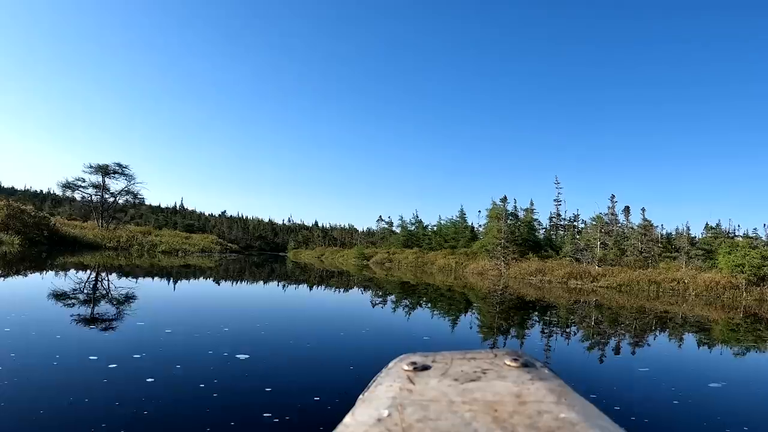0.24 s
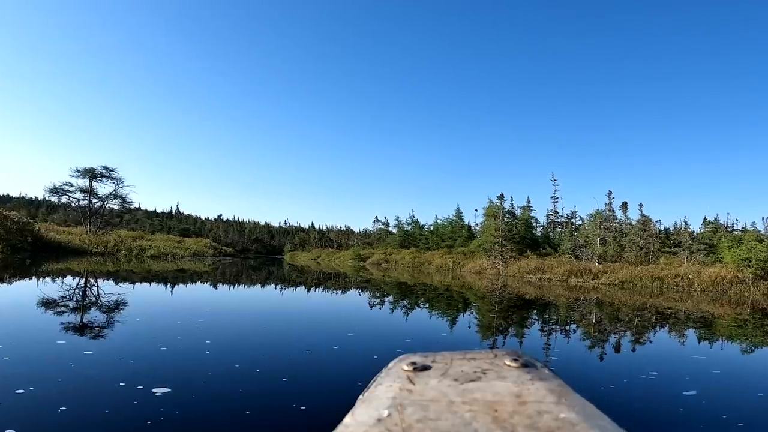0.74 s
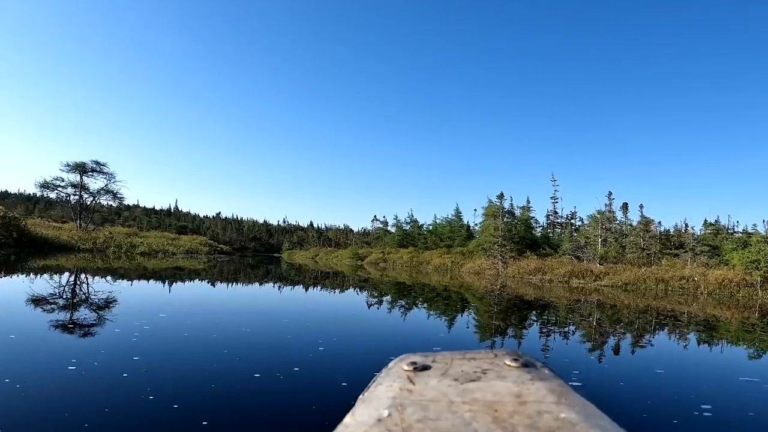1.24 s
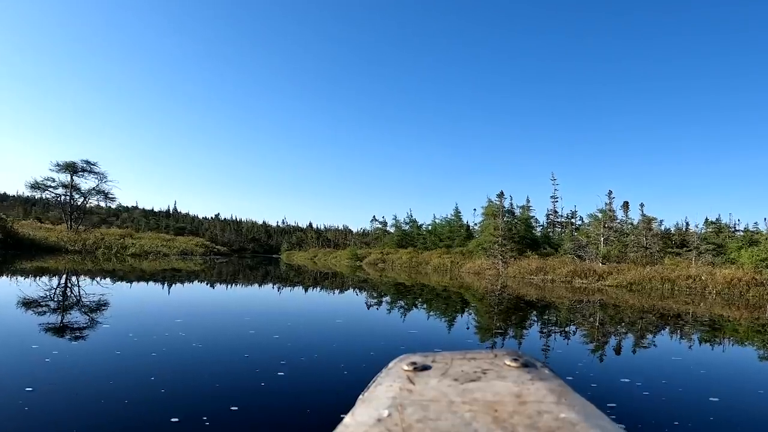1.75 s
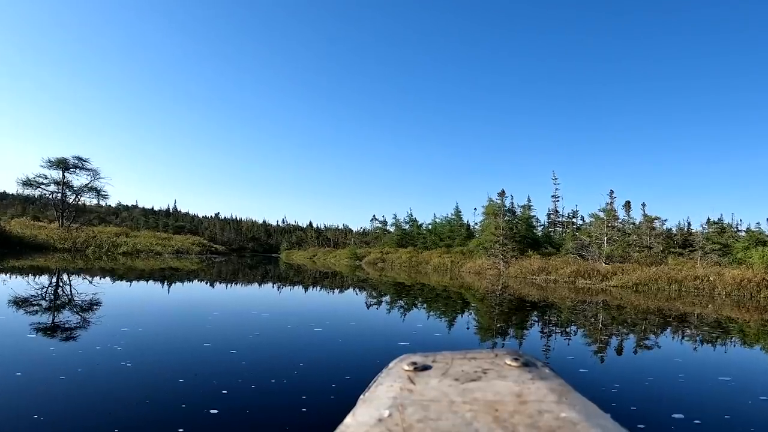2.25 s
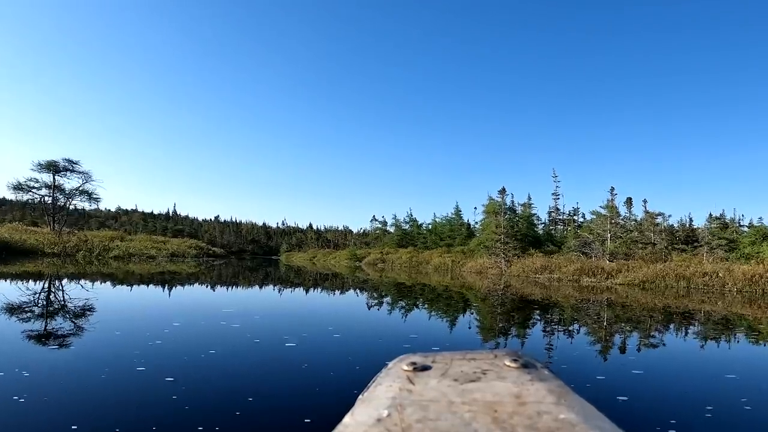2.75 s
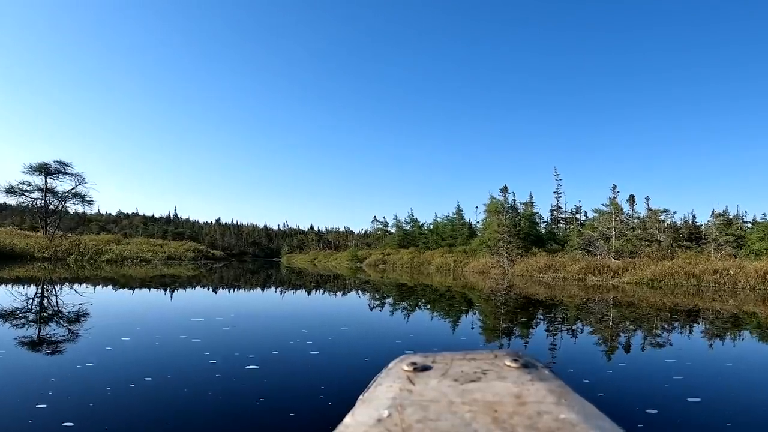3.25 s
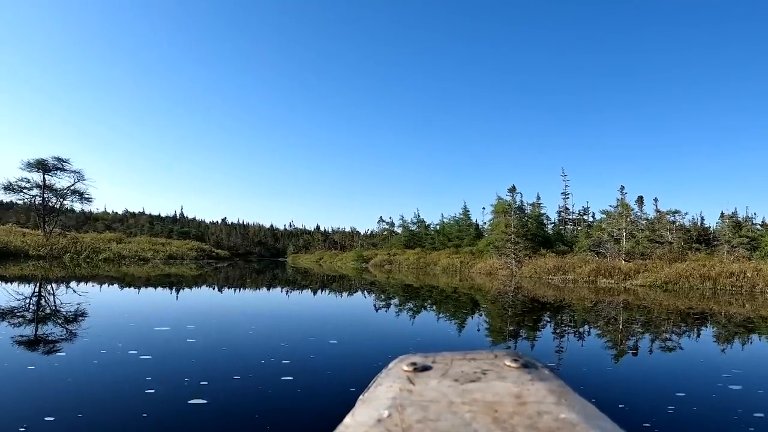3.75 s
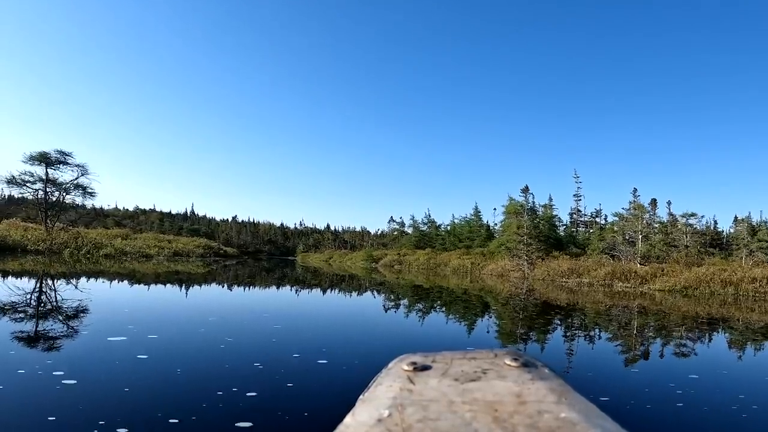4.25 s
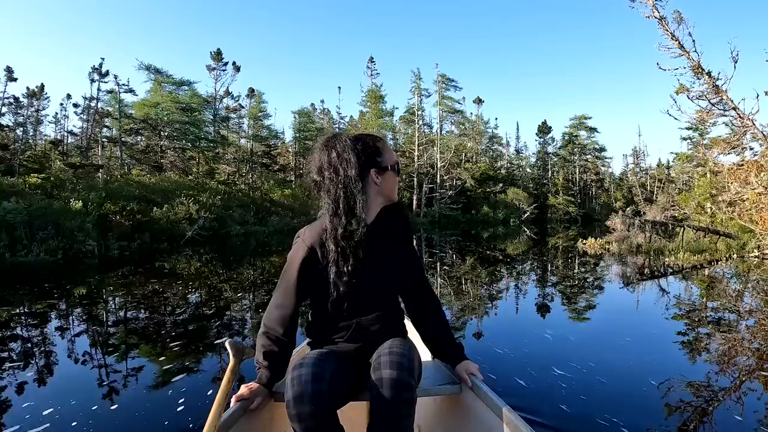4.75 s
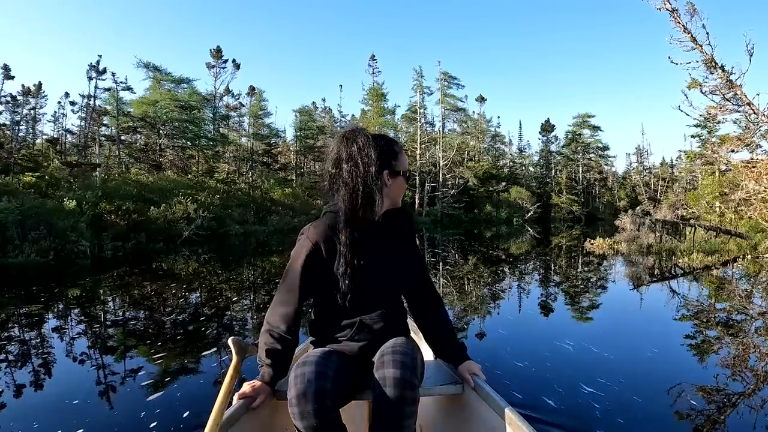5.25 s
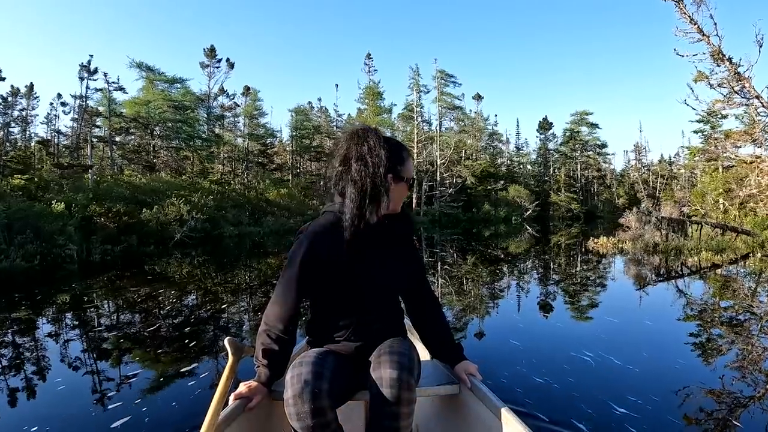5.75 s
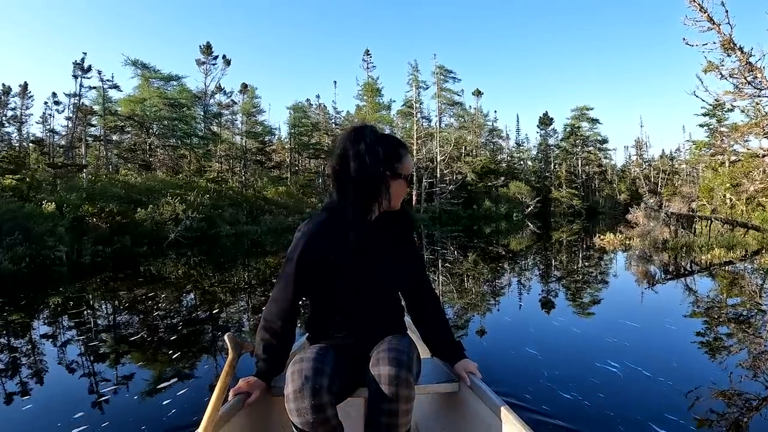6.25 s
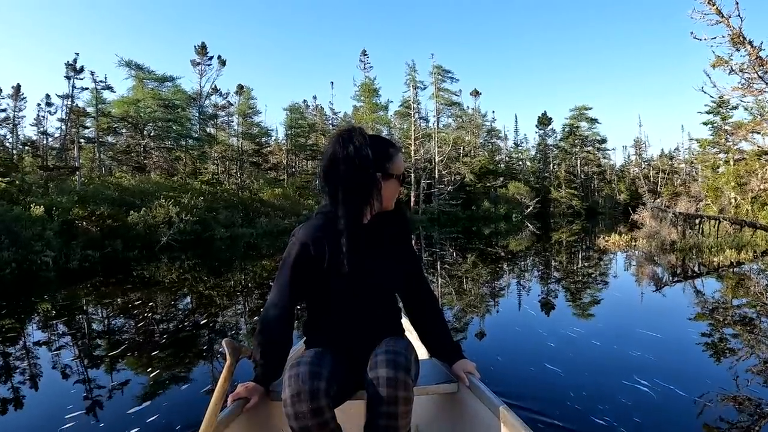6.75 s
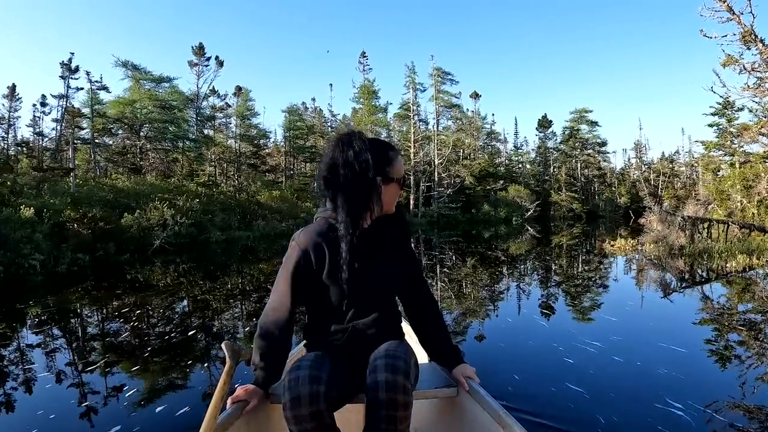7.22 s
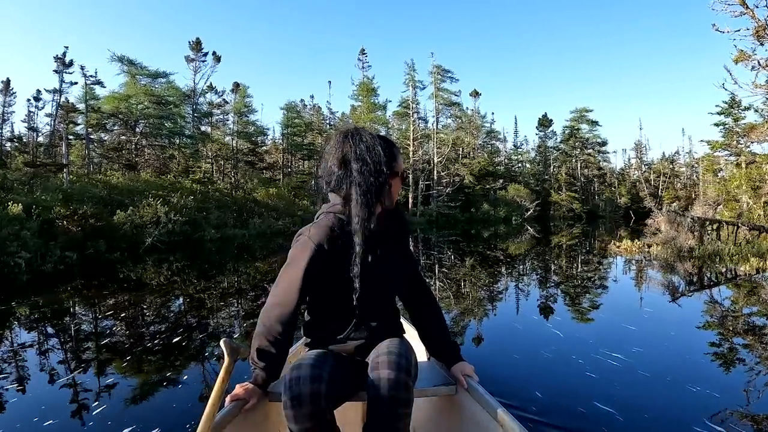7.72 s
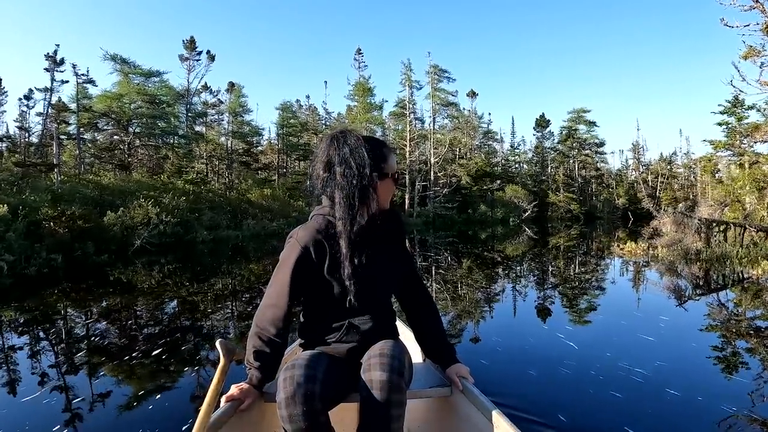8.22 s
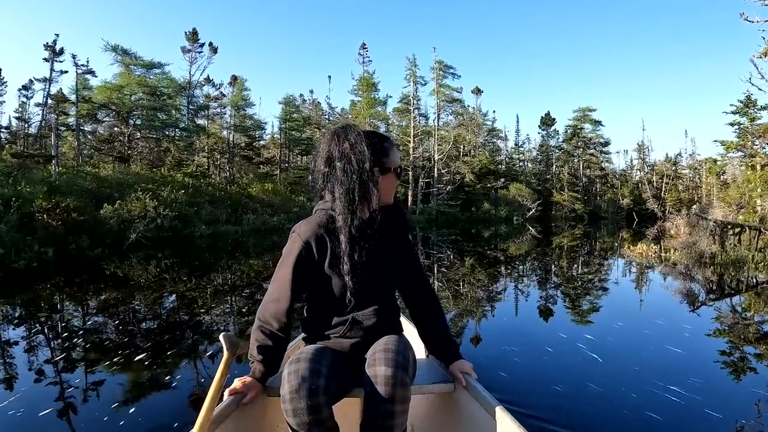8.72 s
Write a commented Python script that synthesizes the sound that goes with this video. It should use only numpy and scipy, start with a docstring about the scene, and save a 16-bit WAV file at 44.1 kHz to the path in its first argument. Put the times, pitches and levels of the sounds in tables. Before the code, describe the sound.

Close stereo from inside a canoe: bubbly paddle swirl and drips at left, thinning out, then low soft thumps and a sharper woody knock. A bright rapid bird trill rises over a renewed plop and gurgling water. Suddenly the water and trill stop; the boat drifts in quiet while a bird sings thin slurred phrases and distant peeps and a blurred trill echo from the trees.

```python
"""Canoe on a still pond

Paddling, then a cut at 4.787 s to the boat drifting. The paddle, at left, stirs froth (clouds of ringing
bubbles over filtered noise) and sheds drops (single bubbles with slaps); blows ring the hull's modes, and
dry noise ticks sound in the boat. One bird trills close by, another sings thin slurred whistles, far peeps
and later far birds echo from the trees: all gliding sines with noise-tail echoes. Light air rumbles on the
microphone (low noise) over the hush of pond and forest (coloured noise).
"""
import sys
import numpy as np
from scipy import signal
from scipy.fft import rfft, irfft, next_fast_len
from scipy.io import wavfile
from scipy.ndimage import map_coordinates

SR = 44100
rng = np.random.default_rng(int(sys.argv[2]) if len(sys.argv) > 2 else 0)


def generate_wav(sig):
    """Save sig (samples, or channels by samples) to the path in sys.argv[1] as 16-bit PCM at SR."""
    pcm = np.round(np.clip(np.atleast_2d(sig).T, -1, 1) * 32767).astype(np.int16)
    wavfile.write(sys.argv[1], SR, pcm)


N = 396018  # samples, 8.98 s

CUT_S, TOP_HZ = 4.787, 12800

# Table levels are relative: each layer applies further gains.
# Hush before and after the cut: hz, level_db
POND_EARLY = [(90, -3.5), (170, 2), (300, -7.5), (460, -8), (750, -19.5), (1100, -19), (1900, -30.5),
              (3000, -30.5), (5200, -43), (7800, -36.5), (10000, -51.5), (12500, -49)]
POND_LATE = [(90, -5.5), (170, 1.5), (300, -10.5), (460, -13), (800, -21), (1250, -19), (2100, -31),
             (3500, -32), (5200, -40.5), (7800, -34.5), (10000, -48.5), (12500, -49.5)]
# Air on the microphone: start_s, level_db
BREEZE = [(0.0, -51), (.95, -47), (1.42, -36.5), (1.62, -48), (1.94, -40.5), (2.15, -46), (2.5, -43.5),
          (2.75, -50), (3.7, -54.5), (4.1, -49), (4.5, -45), (5.0, -54), (6.05, -49), (7.3, -54.5),
          (7.8, -53), (8.55, -50.5), (8.98, -60)]
# Spectra of the moving air and of its slow heaving, independent left and right: hz, level_db
BREEZE_COLOUR = [(15, 2), (30, 1.5), (55, -5), (80, -5), (120, -21.5), (200, -27.5), (400, -90)]
HEAVE_COLOUR = [(8, 1), (22, -1), (40, -8), (70, -29.5), (150, -85)]
# Blade pushes: start_s, attack_s, hold_s, release_s (per 20 dB of fall), level_db,
# spray_db (re level), gurgle_db (re level)
STROKES = [(0.0, 0.0023, 0.016, 0.09, -51, -17.5, -3), (0.018, 0.018, 0.12, 0.75, -59, -15.5, -10),
           (0.087, 0.14, 0.047, 0.1, -64, -2, -20), (.138, .004, .008, .03, -59, -5, -20),
           (.212, .022, .03, .06, -57.5, -16, -14), (.32, .01, .05, .03, -68, -1, -12),
           (1.824, 0.11, 0.056, .06, -66, -19, -14), (3.36, .02, 0.05, 0.22, -60.5, -28, -20),
           (3.5, 0.051, 0.66, 6, -68.5, -19, -16), (3.56, .02, .045, .05, -65, -28, -20),
           (3.953, .01, .04, .05, -64, -25, -18), (4.222, .025, .025, 0.07, -56, -25, -18),
           (4.325, .005, 0.05, 0.16, -55.5, -34, -9), (4.39, .08, 0.6, .1, -59.5, -25, -4),
           (4.718, .008, .06, .1, -61, -28, 0)]
# Spectra of stirred water, fine spray, and eddies dragged under: hz, level_db
WATER_COLOUR = [(200, -12), (400, -8), (560, -3), (760, -7), (1170, 6), (1700, 0), (2500, -1), (3600, -2),
                (5200, -21), (8000, -35)]
SPRAY_COLOUR = [(3500, -11), (5500, -22), (8000, -4.5), (10000, -12), (12000, -5), (14000, -21)]
GURGLE_COLOUR = [(200, -24), (400, -9), (560, 0), (720, -7), (1000, -12), (2000, -32)]
# Loudest drops and trapped air pockets: start_s, level_db, start_pitch_hz, cycles (to -60 dB at start pitch)
BUBBLES = [(.001, -39, 750, 17), (.0105, -32.5, 540, 24), (.0195, -37, 720, 12), (.034, -42, 2900, 10),
           (.044, -38, 2200, 45), (.056, -44, 600, 20), (.099, -46, 2450, 30), (.114, -45, 659, 24),
           (.1525, -30.5, 1240, 15), (.213, -46, 851, 24), (.234, -43, 1310, 26), (.251, -37, 3530, 55),
           (.273, -39, 1340, 24), (.325, -40.5, 242, 34), (.352, -45, 275, 24), (.375, -41, 1424, 6),
           (.476, -42.5, 3120, 30), (.56, -47, 2300, 13), (.628, -51, 1520, 25), (.644, -50.5, 1430, 28),
           (.747, -51, 1750, 36), (1.009, -52, 600, 40), (3.3745, -23.5, 1050, 22), (3.375, -29.5, 403, 9),
           (3.385, -37, 2440, 50), (3.409, -39.5, 1680, 36), (3.428, -46, 2150, 20), (3.569, -48, 1200, 14),
           (3.585, -46.5, 1050, 27), (3.62, -48, 982, 24), (3.755, -49, 1020, 25), (3.821, -45, 1055, 79),
           (3.909, -40, 1660, 45), (4.225, -46, 1510, 50), (4.244, -44, 1100, 24), (4.267, -43, 1230, 35),
           (4.3255, -34.5, 432, 50), (4.326, -37, 1250, 8), (4.343, -44, 1200, 50), (4.361, -41, 980, 16),
           (4.37, -40.5, 1280, 50), (4.404, -45.5, 1060, 55), (4.422, -45, 2600, 45), (4.44, -43, 750, 36),
           (4.509, -39, 577, 22), (4.585, -45, 740, 26), (4.632, -41.5, 560, 24), (4.691, -37, 1540, 36),
           (4.72, -41, 1000, 24), (4.727, -38, 625, 38), (4.772, -37, 620, 11.6)]
# Bubble placing, deep ones near the middle through the hull: pitch_hz, left_minus_right_db
BUBBLE_PAN = [(300, 2), (1000, 13), (1700, 17)]
# Showers of lesser drips off the blade: start_s, end_s, first_level_db, typical_pitch_hz
SHOWERS = [(0.021, .92, -55, 1650), (3.4, 4.2, -58, 1150), (4.38, 4.77, -53, 1250)]
DRIP_FADE_DB_PER_S, DRIP_SCATTER_DB, DRIP_OCTAVES, DRIP_CYCLES = 7, 2, 0.45, 18
CLUSTER_S, CLUSTER_OCTAVES = 0.03, 0.2  # spread of one drip's bubbles
# Dry ticks in the boat: start_s, peak_db, band_hz (passband 0.5 to 1.1 times this, top at most SR / 3)
TICKS = [(.375, -53, 9500), (1.246, -64, 6900), (1.414, -68, 8000), (1.998, -67, 8000), (2.454, -60, 2420),
         (7.246, -61, 5800), (8.237, -61.5, 2500)]
# Whistler's figures, name to notes: delay_s, length_s, start_hz, middle_hz, end_hz, level_db
FIGURES = { "slide": [(0.002, .122, 8000, 7300, 5800, 0)], "lead": [(0, .078, 6200, 6480, 6560, 0)],
           "hook": [(0, .016, 6400, 7250, 8700, -10), (.02, 0.067, 8050, 7360, 7250, 0)],
           "flick": [(0, 0.032, 6900, 8000, 8300, -1)], "rise": [(.003, .067, 6250, 7020, 7360, 0)],
           "swoop": [(-.054, 0.055, 4850, 5280, 4950, -13), (-.006, .012, 5000, 6600, 8400, -16),
           (0.007, 0.087, 8500, 6290, 6220, -0.5)], "fall": [(0, 0.044, 7500, 7280, 6700, 0.5),
           (.032, 0.07, 6960, 5890, 5330, -3)], "climb": [(0, .062, 3450, 4800, 6760, -15.5),
           (.044, 0.058, 6330, 6410, 6400, -4), (.128, .04, 7400, 6800, 6650, -6),
           (.157, .046, 6650, 7110, 7230, 1.5)], }
# Song: start_s, figure, level_db
SONG = [(5.46, "lead", -68), (5.502, "hook", -61), (5.62, "flick", -74.5), (5.708, "lead", -56),
        (5.777, "hook", -58), (5.902, "flick", -70), (5.99, "lead", -58), (6.06, "hook", -52.5),
        (6.18, "rise", -56), (6.334, "swoop", -56), (6.452, "rise", -52), (6.621, "swoop", -63.5),
        (6.746, "rise", -60), (6.911, "swoop", -61), (7.03, "rise", -55.5), (7.139, "fall", -59),
        (7.291, "climb", -56), (7.524, "fall", -59.5)]
SLIDES_START_S, SLIDES_PERIOD_S = 0.495, 0.291
SLIDES_DB, SLIDES_FADE_DB_PER_S = -76, 8.5
# Single reflections from the nearest trunks: delay_s, level_db
TRUNKS = [(.0045, -7), (.012, -12)]
# Far caller's figures, name to notes: delay_s, length_s, start_hz, middle_hz, end_hz, level_db
PEEP_FIGURES = { "slur": [(0, .135, 2620, 2850, 2930, 0)], "step": [(0, .085, 2620, 2690, 2810, -3),
                (.075, .075, 2780, 2930, 2970, 0)], "hold": [(0, .3, 2930, 2960, 3060, 0)],
                "high": [(0, .22, 2820, 2980, 3230, 0)], "low": [(0, .17, 2540, 2690, 2800, 0)], }
# Far peeps: start_s, figure, level_db, direct_share_db
PEEPS = [(0.76, "high", -72, -16), (1.09, "low", -73, -14), (1.6, "high", -73, -14),
         (1.99, "low", -74, -14), (2.52, "high", -76, -16), (3.06, "low", -73, -14),
         (4.922, "slur", -61, -9), (5.668, "slur", -59.5, -9), (6.19, "hold", -68, -13),
         (7.38, "step", -60.5, -17), (8.03, "step", -61, -8), (8.678, "step", -61, -8)]
# Hull blows: start_s, level_db, contact_s
KNOCKS = [(1.134, -31.5, 0.013), (1.387, -22.5, 0.018), (1.411, -34, 0.015), (2.236, -43, .0016),
          (2.243, -20.5, 0.0018), (2.263, -29, 0.002), (2.283, -36, 0.0013), (2.372, -28, 0.018),
          (3.376, -41, 0.0032)]
# Hull modes, nominal: pitch_hz, level_db, t60_s
HULL = [(46.2, 2.5, 0.14), (80, -10.5, 0.25), (121.4, -9, 0.27), (179, -4.5, 0.16), (194, -10, 0.33),
        (238, -7.5, 0.16), (331, -19.5, 0.2), (444, -26, 0.21), (666, -27.5, 0.14), (930, -12, 0.061)]
# Sweeps of one trill syllable: delay_s, length_s, start_hz, middle_hz, end_hz, level_db
SYLLABLE = [(-.0005, 0.036, 4900, 4160, 3330, -2.7), (0.045, 0.031, 6300, 5900, 4350, -11),
            (0.084, 0.026, 3050, 4380, 4950, -5.3), (.1035, 0.011, 8200, 5380, 4100, -15)]
# Near trill: start_s, opening_sweep_db, other_sweeps_db
TRILL = [(2.696, -62, -52), (2.846, -52.5, -47.5), (2.996, -48.5, -43.5), (3.145, -44.5, -39.5),
         (3.294, -41.5, -38.5), (3.442, -39, -37.5), (3.589, -36.5, -37), (3.735, -36.5, -37),
         (3.878, -36, -36.5), (4.024, -35, -36.5), (4.169, -36, -38), (4.315, -39, -40),
         (4.461, -40.5, -39), (4.608, -41, -42), (4.753, -42.5, -43)]
# Far warble, level curve: time_s, level_db
FAR_WARBLE = [(5.345, -75), (5.9, -73.5), (6.4, -71.5), (7.1, -77)]
# Trill so deep in the forest that only its echo arrives, level curve: time_s, level_db
FAR_TRILL = [(7.1, -68), (7.6, -62.5), (8.001, -65.5), (8.3, -79)]


def undb(db):
    """Decibels to gain."""
    return np.exp(np.asarray(db) * np.log(10) / 20)


def unit(x):
    """Scale to rms 1."""
    return x / (np.sqrt(np.mean(x ** 2)) + 1e-12)


def clock(length_s):
    """Sample times of a sound of this length."""
    return np.arange(max(int(length_s * SR), 8)) / SR


def curve(times_s, values):
    """Straight lines between points, one value a sample."""
    return np.interp(np.arange(N) / SR, times_s, values)


def colour(x, points):
    """Filter by a spectrum of (hz, db) points; the result has rms 1."""
    hz, db = np.transpose(points)
    size = next_fast_len(N)
    bins_hz = np.maximum(np.arange(size // 2 + 1) * SR / size, 1)
    gain = undb(np.interp(np.log(bins_hz), np.log(hz), db))
    return unit(irfft(rfft(x, size) * gain, size)[..., :N])


def pan(x, pan_db, lag_s=0):
    """Share between left and right by left-minus-right level; lag_s delays the left."""
    gains = undb(np.array([[pan_db], [-pan_db]]) / 2)
    left, right = x * gains / gains.mean()
    at = np.arange(len(left))
    return np.array([np.interp(at - lag_s * SR, at, left, left=0), right])


def spread(mid, side, side_db):
    """Stereo from a common part and a part of opposite sign in the two ears."""
    return mid + undb(side_db) * side * np.array([[1], [-1]])


def add(out, start_s, x):
    """Mix a sound in at a time."""
    i = int(np.clip(start_s * SR, 0, N - 1))
    out[..., i:i + x.shape[-1]] += x[..., :N - i]


def wander(rate_hz):
    """Straight lines between random normal values drawn at this rate."""
    return curve(np.arange(400) / rate_hz, rng.standard_normal(400))


def echoes(x, t60_s, delay_s):
    """Diffuse reflections as a decaying noise tail, different in each ear."""
    t = np.arange(SR) / SR
    onset = np.clip(t / delay_s - 1, 0, 1)
    tail = rng.standard_normal((2, SR)) * np.exp(-np.log(1000) * t / t60_s) * onset
    tail = tail / np.sqrt(np.sum(tail ** 2) / 2)
    return signal.fftconvolve(x[None], tail, axes=1)[:, :N]


def bubble(hz, cycles, rise):
    """A pocket of air rings and climbs in pitch as it nears the surface."""
    t = clock(cycles / hz)
    age = t * hz / cycles
    ring = np.sin(2 * np.pi * hz * t * (1 + rise * age / 2))
    return ring * np.exp(-np.log(1000) * age) * (1 - np.exp(-2 * hz * t)) ** 2


def whistle(length_s, start_hz, middle_hz, end_hz, waver=0.004, flutter_db=2.5, swell=1.45):
    """A sine bends through three pitches with small random waver; swell above 1 peaks past the middle."""
    u = clock(length_s) / length_s
    pitch, loud = (np.interp(u, np.linspace(0, 1, 12), row) for row in rng.standard_normal((2, 12)))
    bend = np.polyfit([0, 0.5, 1], [start_hz, middle_hz, end_hz], 2)
    hz = np.polyval(bend, u) * (1 + waver * pitch)
    tone = np.sin(2 * np.pi * np.cumsum(hz) / SR)
    return tone * np.sin(np.pi * u ** swell) * undb(flutter_db * loud), u


def pond(points, level_db, pan_db, bass_side_db=-7, treble_hz=7000, treble_pan_db=5):
    """Hush of open water and forest: more alike in both ears in the bass, wide above, top leaning left."""
    mid, side = colour(rng.standard_normal((2, N)), points)
    bass = signal.sosfilt(signal.butter(1, 900, fs=SR, output="sos"), side)
    side = side - bass + undb(bass_side_db) * bass
    hush = spread(mid, side, -2.5) * undb(level_db + 0.69 * wander(5.5))
    treble = signal.sosfiltfilt(signal.butter(2, treble_hz, "high", fs=SR, output="sos"), hush)
    return pan(hush - treble, pan_db) + pan(treble, treble_pan_db)


def breeze(gust_db=1, air_db=-1.5, heave_db=-3, heave_pan_db=-6, calm_db=-51, buffet_share=0.88):
    """Air buffets the microphone in small gusts, over a deeper heaving that grows faster with the wind."""
    mid, side = colour(rng.standard_normal((2, N)), BREEZE_COLOUR)
    heave = undb(heave_db) * pan(colour(rng.standard_normal((2, N)), HEAVE_COLOUR), heave_pan_db)
    over_calm_db = curve(*np.transpose(BREEZE)) - calm_db + gust_db * wander(12)
    buffets = spread(mid, side, -15) * undb(buffet_share * over_calm_db)
    return (buffets + heave * undb(over_calm_db)) * undb(calm_db + air_db)


def froth(low_hz, high_hz, cycles, scatter_db, count):
    """Small bubbles of random size ring at random times before the cut."""
    out = np.zeros(N)
    for when, size, life, loud in rng.random((count, 4)):
        strength = undb(scatter_db * min(-np.log(1 - loud), np.pi))
        hz = low_hz * (high_hz / low_hz) ** size
        add(out, when * CUT_S, strength * bubble(hz, cycles * (0.5 + life), 0.28))
    return out


def slosh(x, octaves, rate_hz):
    """Wandering playback speed: all resonances slide together as the water's cavities change size."""
    at = np.cumsum(2 ** (octaves * wander(rate_hz)))
    return unit(map_coordinates(x, [at], order=1, mode="mirror"))


def strokes(wash_db=-8, crackle_db=-6, water_db=-5.2, spray_db=-2.5, mist_db=-6, gurgle_db=-4,
            churn_db=2, churn_rate_hz=45):
    """The blade stirs crackling froth over a wash, deep eddies and spray; pushes swell, hold and die away."""
    water = colour(froth(385, 3930, 30, 3.9, count=2400), WATER_COLOUR)
    water = water + undb(wash_db) * colour(rng.standard_normal(N), WATER_COLOUR)
    crackle = colour(froth(900, 5000, 4, 5, count=1500), WATER_COLOUR)
    water = slosh(water + undb(crackle_db) * crackle, octaves=0.09, rate_hz=22)
    spray = colour(froth(3000, 14440, 26, 5, count=3600), SPRAY_COLOUR)
    spray = spray + undb(mist_db) * colour(rng.standard_normal(N), SPRAY_COLOUR)
    eddies = colour(froth(380, 1100, 34, 2.5, count=900), GURGLE_COLOUR)
    t, flow, fizz, drag = np.arange(N) / SR, 0, 0, 0
    for start_s, attack_s, hold_s, release_s, level_db, fizz_db, deep_db in STROKES:
        fall_db = 20 * np.maximum(t - start_s - attack_s - hold_s, 0) / release_s
        push = np.clip((t - start_s) / attack_s, 0, 1) * undb(level_db - fall_db)
        flow = np.hypot(flow, push)
        fizz = np.hypot(fizz, push * undb(fizz_db))
        drag = np.hypot(drag, push * undb(deep_db))
    out = flow * undb(water_db + churn_db * wander(churn_rate_hz)) * water
    out = out + fizz * undb(spray_db) * spray + drag * undb(gurgle_db) * eddies
    hull_side = undb(-4) * echoes(out, 0.035, 0.0008)
    return pan(out + hull_side, 9.4, lag_s=0.00014)


def drips(count=20, size=3):
    """Lesser drips at uneven moments, each a cluster of like-sized bubbles; columns as in BUBBLES."""
    rows = []
    for start_s, end_s, level_db, hz in SHOWERS:
        ages_s = (np.arange(count) + rng.random(count)) / count * (end_s - start_s)
        for age_s, (loud, girth) in zip(ages_s, rng.standard_normal((count, 2))):
            drip_db = level_db - DRIP_FADE_DB_PER_S * age_s + DRIP_SCATTER_DB * loud
            for late, detune in rng.random((size, 2)):
                octaves = DRIP_OCTAVES * girth + CLUSTER_OCTAVES * (2 * detune - 1)
                rows.append((start_s + age_s + CLUSTER_S * late, drip_db, hz * 2 ** octaves, DRIP_CYCLES))
    return rows


def drops(rise=0.16, slap_db=-17):
    """Each drop slaps the surface and leaves a ringing bubble; the hull side reflects it."""
    out, t = np.zeros((2, N)), clock(0.03)
    slaps = colour(rng.standard_normal(N), WATER_COLOUR)
    slap_shape = np.exp(-t / 0.0049) * (1 - np.exp(-t / 0.0019))
    for k, (start_s, level_db, hz, cycles) in enumerate(BUBBLES + drips()):
        pan_db = np.interp(hz, *np.transpose(BUBBLE_PAN))
        slap = np.take(slaps, k * len(t) + np.arange(len(t)), mode="wrap") * slap_shape
        add(out, start_s, pan(undb(level_db) * bubble(hz, cycles, rise), pan_db, lag_s=0.0001))
        add(out, start_s, pan(undb(level_db + slap_db) * slap, pan_db))
    return out + pan(undb(-6) * echoes(out.mean(axis=0), 0.087, 0.0013), 7.5)


def ticks(decay_s=0.003, attack_s=0.0014):
    """Brief dry clicks: noise bursts through a broad band, echoed inside the boat."""
    out, t = np.zeros(N), clock(0.045)
    for start_s, peak_db, hz in TICKS:
        band = signal.butter(1, [hz / 2, min(hz * 1.1, SR / 3)], "band", fs=SR, output="sos")
        burst = rng.standard_normal(len(t)) * np.exp(-t / decay_s) * (1 - np.exp(-t / attack_s))
        click = signal.sosfilt(band, burst)
        add(out, start_s, undb(peak_db) * click / np.abs(click).max())
    inside = undb(-8) * echoes(out, 0.04, 0.002)
    return pan(out + inside, 6.3)


def trunks(x, scatter=0.15):
    """First reflections of a note; as it glides they beat against it and make it flutter."""
    out = np.zeros(len(x) + SR // 10)
    add(out, 0, x)
    for delay_s, level_db in TRUNKS:
        add(out, delay_s * (1 + scatter * rng.standard_normal()), undb(level_db) * x)
    return out


def song(trees_db=-11, count=6):
    """Thin slurred whistles that hang on among the trees: faint even slides that fade, later the full song."""
    out = np.zeros(N)
    slides = [(SLIDES_START_S + age_s, "slide", SLIDES_DB - SLIDES_FADE_DB_PER_S * age_s)
              for age_s in SLIDES_PERIOD_S * np.arange(count)]
    for start_s, figure, level_db in slides + SONG:
        for delay_s, length_s, start_hz, middle_hz, end_hz, note_db in FIGURES[figure]:
            note = whistle(length_s, start_hz, middle_hz, end_hz, waver=0.009, swell=1.24)[0]
            add(out, start_s + delay_s, undb(level_db + note_db - 1) * trunks(note))
    trees = undb(trees_db) * echoes(out, 0.68, 0.017)
    return pan(out + trees, 7.4)


def peeps(forest_db=-6, shore_db=-21, shore_s=0.085):
    """Far calls slur or step upward; the shore repeats each and the forest blurs it, hidden callers most."""
    out, direct, shore = np.zeros((3, N))
    for start_s, figure, level_db, direct_db in PEEPS:
        for delay_s, length_s, start_hz, middle_hz, end_hz, note_db in PEEP_FIGURES[figure]:
            note = whistle(length_s, start_hz, middle_hz, end_hz, waver=0.009, swell=1)[0]
            note = undb(level_db + note_db) * note
            add(out, start_s + delay_s, note)
            add(direct, start_s + delay_s, undb(direct_db) * note)
    add(shore, shore_s, undb(shore_db) * out)
    return pan(direct + shore + undb(forest_db) * echoes(out, 0.7, 0.014), 4)


def hull(crack_db=-36, crack_decay_s=0.012, detune=0.025):
    """A blow rings the hull; a short contact cracks, a long soft one leaves only the deepest modes."""
    out, t = np.zeros((2, N)), clock(0.54)
    wood = signal.butter(2, [600, 2200], "band", fs=SR, output="sos")
    for start_s, level_db, contact_s in KNOCKS:
        for hz, mode_db, t60_s in HULL:
            struck_hz = hz * (1 + detune * rng.standard_normal())
            ring = np.sin(2 * np.pi * struck_hz * t) * np.exp(-np.log(1000) * t / t60_s)
            ring = ring * (1 - np.exp(-t / contact_s))
            softness = 1 / (1 + (hz * contact_s) ** 2)
            mode = undb(level_db + mode_db) * softness * ring
            add(out, start_s, pan(mode, -5 if hz < 100 else 1.5, lag_s=0.00034))
        crack = signal.sosfilt(wood, rng.standard_normal((2, len(t)))) * np.exp(-t / crack_decay_s)
        add(out, start_s, undb(level_db + crack_db) * (0.0035 / contact_s) ** 2 * crack)
    return out


def syllable(opening_db=0, rest_db=0, skirt_db=15, vary=0.016, uneven_db=1, rasp_db=-19):
    """Four quick, raspy, randomly varied sweeps: down, down from higher, up, and a snap down."""
    out = np.zeros(SR // 4)
    grain = signal.butter(2, 700, fs=SR, output="sos")
    for k, (delay_s, length_s, start_hz, middle_hz, end_hz, sweep_db) in enumerate(SYLLABLE):
        pitches_hz = np.array([start_hz, middle_hz, end_hz]) * (1 + vary * rng.standard_normal(3))
        note, u = whistle(length_s, *pitches_hz, waver=0.006, flutter_db=1.8, swell=0.85)
        roughness = unit(signal.sosfilt(grain, rng.standard_normal(len(out))))[:len(u)]
        rasp = 1 + undb(rasp_db) * roughness
        level_db = sweep_db + (rest_db if k else opening_db) + uneven_db * rng.standard_normal()
        add(out, delay_s + 0.0046, note * rasp * undb(level_db - skirt_db * np.abs(2 * u - 1)))
    return out


def near_trill(bank_db=-17, trees_db=-15.5):
    """A bird on the left bank repeats its syllable, swelling and easing; bank and trees reflect it."""
    out = np.zeros(N)
    for start_s, opening_db, rest_db in TRILL:
        add(out, start_s, syllable(opening_db, rest_db))
    bank = undb(bank_db) * echoes(out, 0.08, 0.0061)
    trees = undb(trees_db) * echoes(out, 0.54, 0.027)
    return pan(out + bank, 7, lag_s=-10 / SR) + pan(trees, 2.9)


def far_birds(warble_period_s=0.168, trill_period_s=0.045):
    """Across the pond one bird slides down and up; another trills, smeared to a wash by the forest."""
    warble, trill = np.zeros((2, N))
    times_s, levels_db = np.transpose(FAR_WARBLE)
    for start_s in np.arange(times_s[0], times_s[-1], warble_period_s):
        level_db = np.interp(start_s, times_s, levels_db)
        down, up = undb(level_db + 2.2 * rng.standard_normal(2))
        add(warble, start_s, down * whistle(0.045, 4150, 3720, 3300, waver=0.022, swell=1)[0])
        add(warble, start_s + 0.055, 0.75 * up * whistle(0.09, 3200, 4050, 5200, waver=0.025, swell=1)[0])
    times_s, levels_db = np.transpose(FAR_TRILL)
    for start_s in np.arange(times_s[0], times_s[-1], trill_period_s):
        level_db = np.interp(start_s, times_s, levels_db) - 10.5
        add(trill, start_s, undb(level_db) * whistle(0.07, 6600, 4750, 3500, waver=0.036)[0])
    warble_wash = undb(-6) * echoes(warble, 0.71, 0.0033)
    return pan(undb(-11) * warble + warble_wash + echoes(trill, 0.76, 0.0024), 1.4)


def scene():
    """Paddling until the cut, drifting after it; the other layers run across it."""
    under_way = curve([CUT_S - 0.004, CUT_S], [1, 0])
    paddling = strokes() + drops() + near_trill() + pond(POND_EARLY, -62.5, 0.21)
    drifting = far_birds() + pond(POND_LATE, -65.5, -1.1)
    throughout = hull() + ticks() + song() + peeps() + breeze()
    return under_way * paddling + (1 - under_way) * drifting + throughout


def record(dry):
    """A steep low-pass ends the treble at TOP_HZ."""
    return signal.sosfilt(signal.ellip(8, 0.2, 70, TOP_HZ, fs=SR, output="sos"), dry)


dry = scene()
out = record(dry)
generate_wav(out)
```